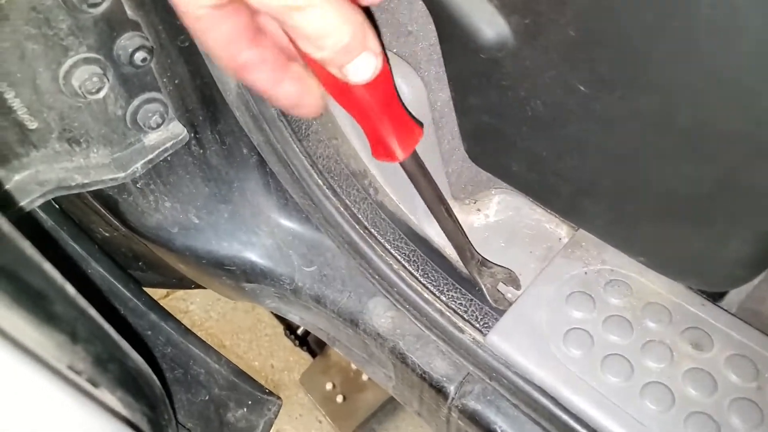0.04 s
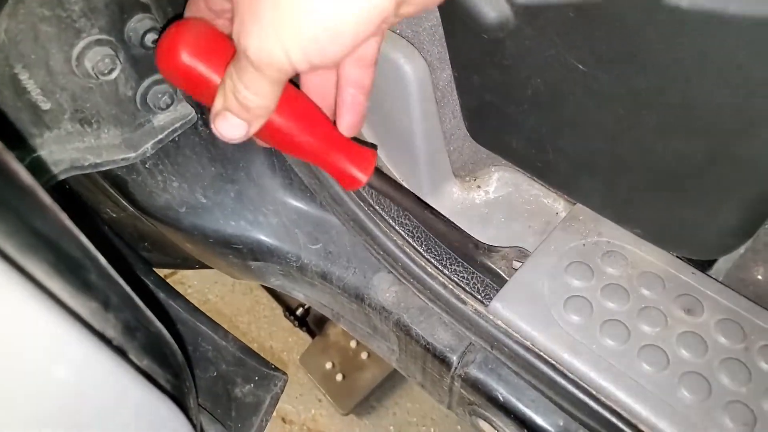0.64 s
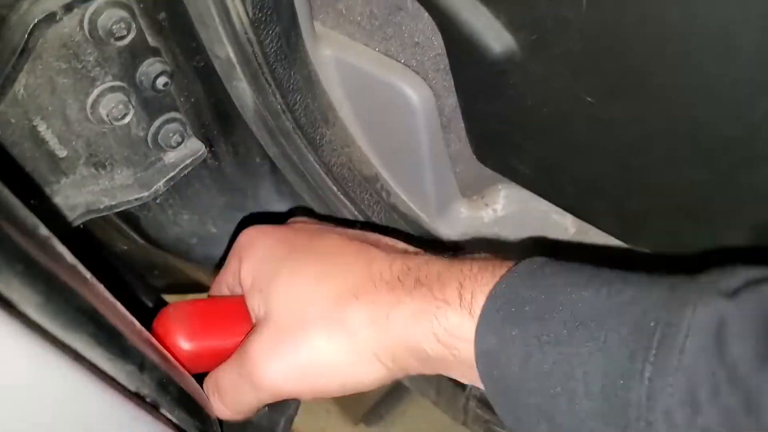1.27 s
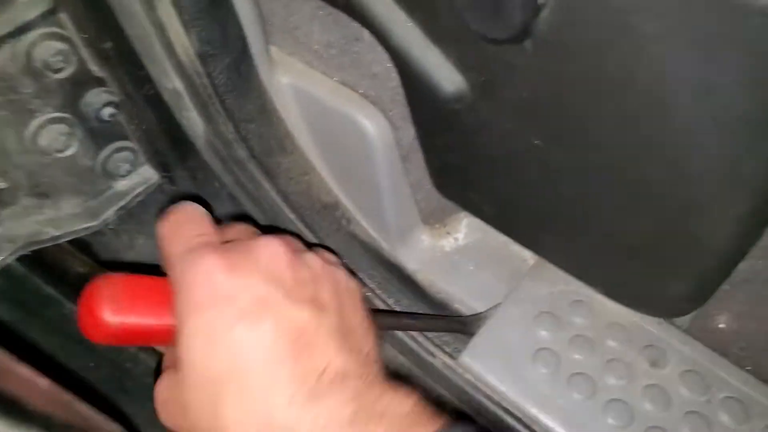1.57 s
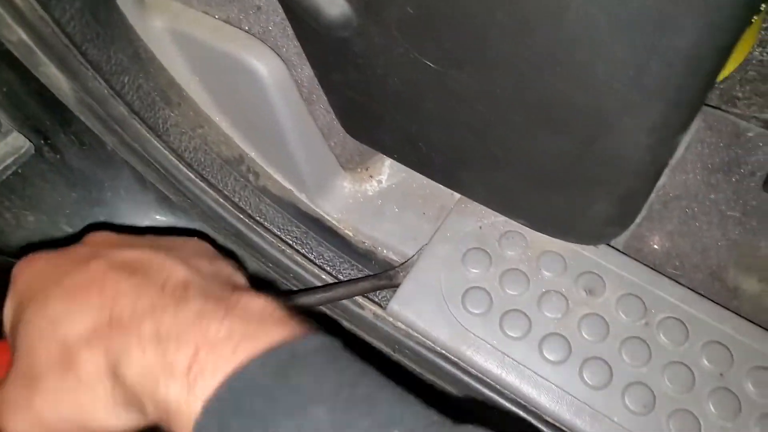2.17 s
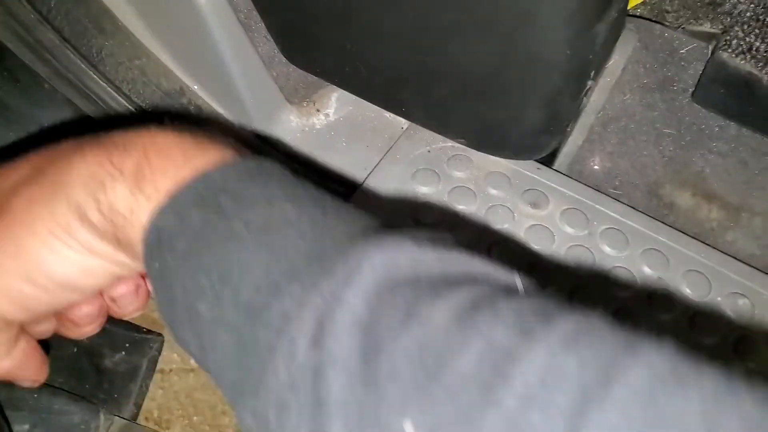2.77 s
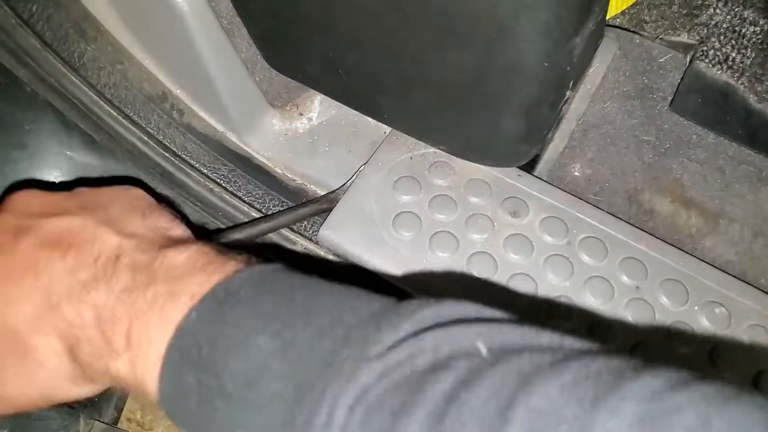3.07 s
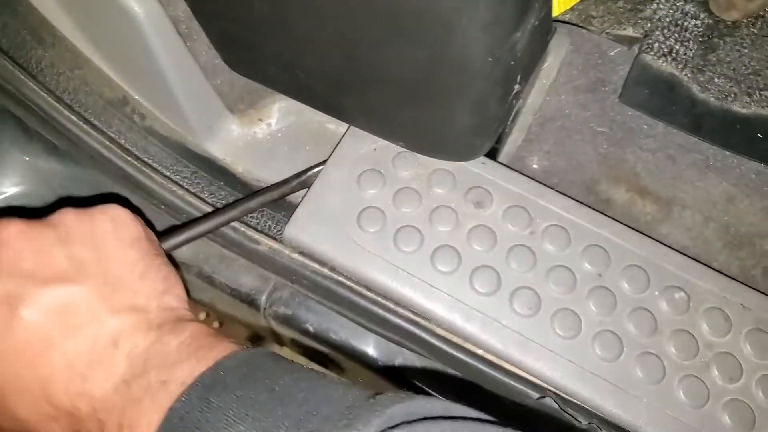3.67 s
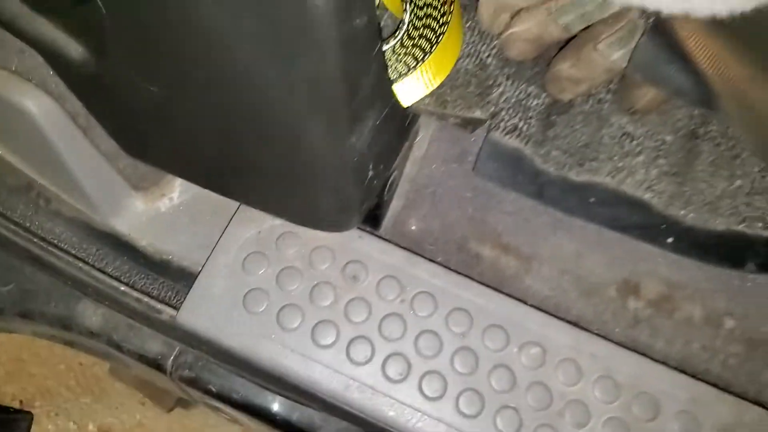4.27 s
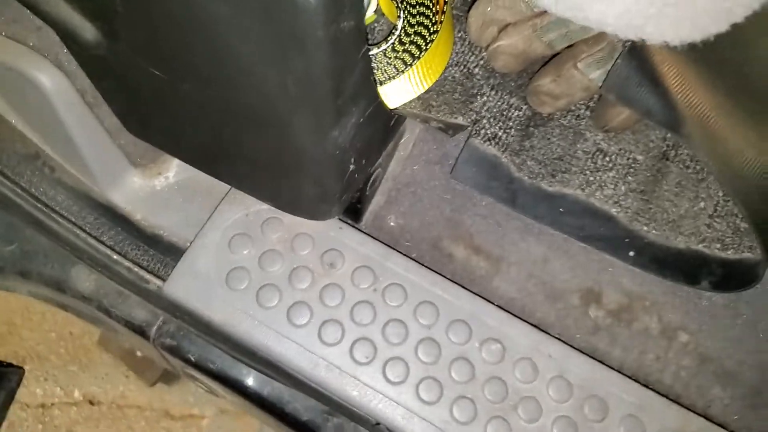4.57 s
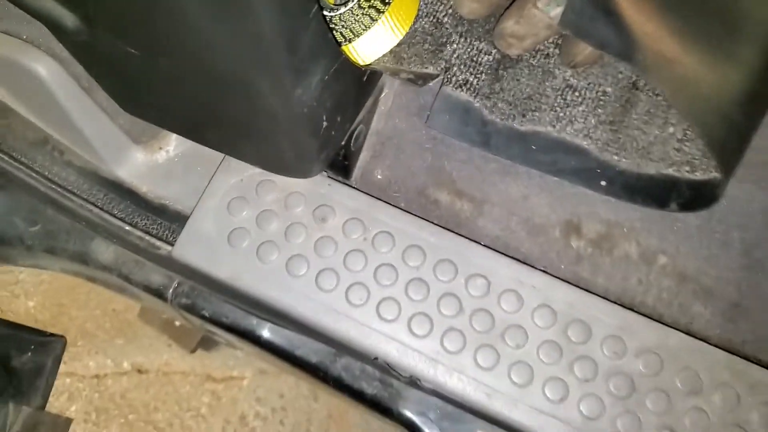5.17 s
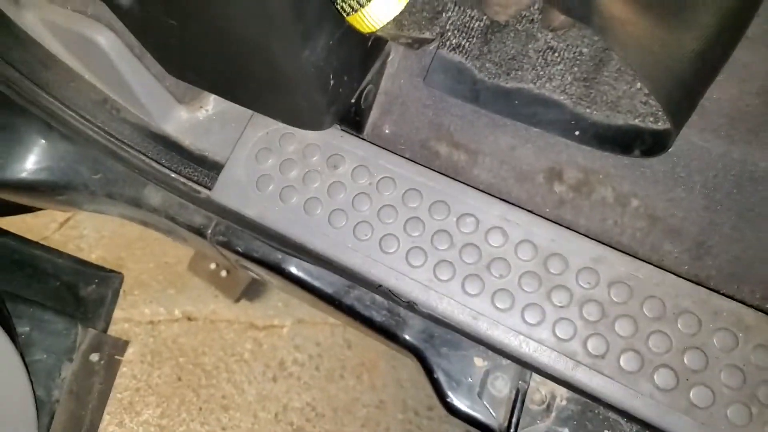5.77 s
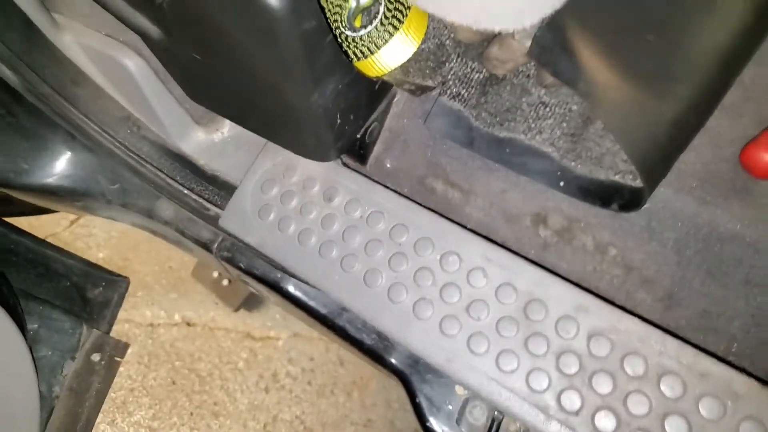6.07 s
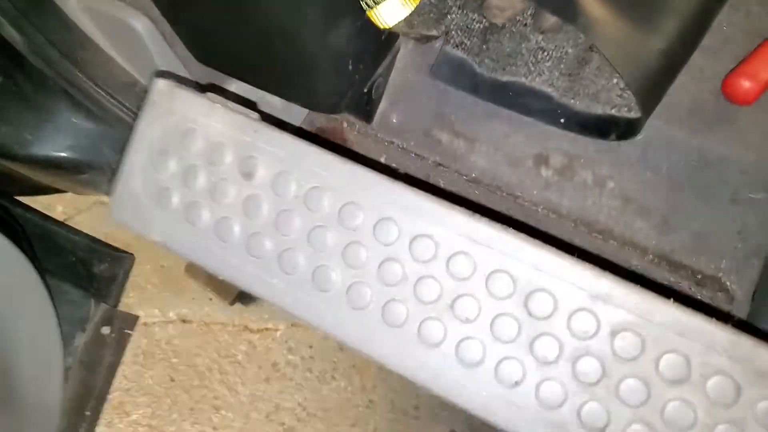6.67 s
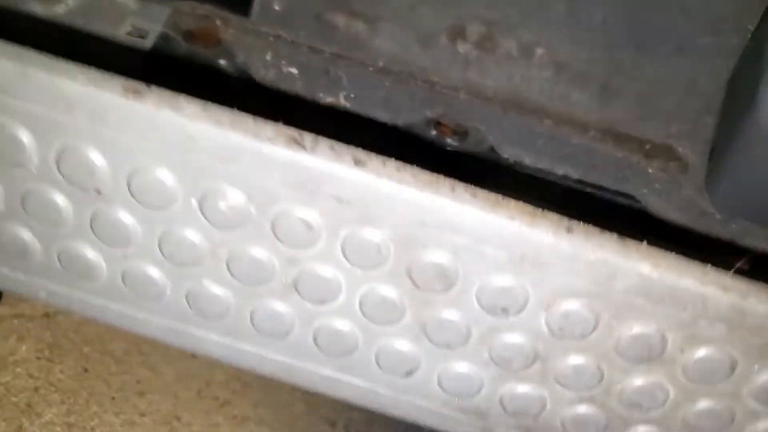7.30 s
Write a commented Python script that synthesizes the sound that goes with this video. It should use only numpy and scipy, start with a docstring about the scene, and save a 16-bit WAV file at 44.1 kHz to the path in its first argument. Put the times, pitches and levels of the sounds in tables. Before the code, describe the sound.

A steel prying tool works on a plastic sill cover, close and slightly left, with a short vehicle cab echo. The tool clinks at about 0.3 seconds, a clip snaps at 0.6 and a scraping knock follows at 0.8. At 1.3 comes a loud crack with a hollow panel boom. Hands and a sleeve rub the plastic between blows. Sharp snaps land around 2.4, then scrapes and knocks crowd together from 2.7 to 3.8, strongest near 3.5 with a deep thump. A lull follows, with faint ticks and a dull thud at 4.7. Another clip snaps at 5.5. Just after 6 seconds the cover judders with a brief low groan ending in a click. More rubbing, a soft knock at 6.8 and light scrapes around 7.3 finish the job. A quiet workshop hum and low rumble continue throughout.

```python
"""A steel prying tool levers a plastic sill cover off its clips, close to the microphone in a vehicle cab.
The tool taps and scrapes, the clips snap loose and knock the hollow sill, and body panels boom.
Hands and sleeve rub the plastic between the blows, then work the cover free; it judders on a clip.
The work sits a little to the left, with a short cab echo; further off a workshop hums quietly."""
import sys
import numpy as np
from scipy import signal
from scipy.fft import rfft, irfft, next_fast_len
from scipy.io import wavfile
from scipy.ndimage import uniform_filter1d

SR = 44100
rng = np.random.default_rng(int(sys.argv[2]) if len(sys.argv) > 2 else 0)


def inscribe(sig):
    """Save sig as 16-bit PCM at rate SR to the path in sys.argv[1].

    A 1-D sig is mono; a 2-D sig holds one channel per row.
    Samples are clipped to [-1, 1] before scaling.
    """
    pcm = np.round(np.clip(np.atleast_2d(sig).T, -1, 1) * 32767)
    wavfile.write(sys.argv[1], SR, pcm.astype(np.int16))


N = 332514
T = np.arange(N) / SR


def gain_of(db):
    """Decibels to amplitude."""
    return 10 ** (np.asarray(db) / 20)


def unit_rms(x):
    """Scales to unit rms."""
    return x / np.sqrt(np.mean(x ** 2) + 1e-20)


def curve_at(points, hz):
    """Reads a curve on a log-frequency axis."""
    f, value = np.transpose(points)
    return np.interp(np.log(hz + 1), np.log(f + 1), value)


def add(mix, s, sound):
    """Mixes a sound into both channels at s seconds."""
    part = mix[:, round(s * SR):][:, :sound.shape[1]]
    part += sound[:, :part.shape[1]]


def coloured(x, spectrum):
    """Gives x a spectrum, at unit rms."""
    size = next_fast_len(N)
    gains = gain_of(curve_at(spectrum, np.fft.rfftfreq(size, 1 / SR)))
    return unit_rms(irfft(rfft(x, size) * gains, size)[..., :N])


def pair(x, likeness, left_db):
    """Two unrelated signals become partly alike channels, the right one quieter by left_db."""
    right = likeness * x[0] + np.sqrt(1 - likeness ** 2) * x[1]
    return np.array([x[0], right * gain_of(-left_db)])


def band(x, lo_hz, hi_hz, order=3):
    """Causal band-pass."""
    return signal.sosfilt(signal.butter(order, [lo_hz, hi_hz], "band", fs=SR, output="sos"), x)


def ring(t, hz, db, t60):
    """One dying mode."""
    return gain_of(db - 60 * t / t60) * np.sin(2 * np.pi * hz * t)


def swell(t, rise, fall, roundness):
    """A movement peaks at t = 0 and dies away; roundness 1 is pointed, 2 a bell."""
    return np.exp(-np.minimum(abs(t / np.where(t < 0, rise, fall)) ** roundness, 30))


def drift():
    """A slow wander at unit rms."""
    return unit_rms(sum(np.sin(2 * np.pi * (hz * T + rng.random())) for hz in np.geomspace(.5, 6, 7)))


def workshop(rumble_db=-1, hiss_db=-72, hum_db=-2, waver_db=3, swell_db=2):
    """The wavering hum of distant machinery, the rumble of the cab and a faint steady hiss."""
    # Machinery tones. Each row: pitch in Hz, relative level in dB.
    tones = [(48.4, -50), (118.4, -66.5)]
    # The rumble swells while the cab is leaned on. Each row: time in seconds, relative level in dB.
    sway = [(0, -51.5), (.55, -49.5), (.8, -41.5), (1.1, -50), (1.7, -53), (2.5, -49.5), (3.1, -47.5),
            (3.9, -50), (4.2, -54), (5.05, -57), (5.6, -47.5), (5.9, -51), (6.2, -43), (6.45, -52.5),
            (7.54, -55.5)]
    # Colours of rumble and hiss. Each row: frequency in Hz, relative level in dB.
    rumble_colour = [(15, -36.5), (30, -20), (45, -2), (62, 0), (85, -3.5), (120, -12.5), (157, -19),
                     (242, -23.5), (427, -41), (1000, -50.5), (2500, -62)]
    hiss_colour = [(500, -6.5), (2400, -9), (3000, -3), (4400, -5), (5300, 1.5), (6700, -0.5), (7500, -18),
                   (11000, -22), (15000, -13)]
    hum = sum(np.sqrt(2) * gain_of(db + waver_db * drift()) * np.sin(2 * np.pi * (hz * T + rng.random()))
              for hz, db in tones)
    sway_db = np.interp(T, *np.transpose(sway)) + swell_db * drift()
    rumble = coloured(pair(rng.standard_normal((2, N)), .97, .5), rumble_colour) * gain_of(sway_db)
    hiss = coloured(pair(rng.standard_normal((2, N)), 0, 10.5), hiss_colour)
    return gain_of(hum_db) * hum + gain_of(rumble_db) * rumble + gain_of(hiss_db) * hiss


def room(x, build_up_s=.0022):
    """Cab and workshop return a diffuse tail, each band dying at its own speed."""
    # Ring of the space. Each row: frequency in Hz, t60 in seconds.
    decays = [(100, .5), (400, 0.3759), (1000, 0.3332), (3000, 0.26), (6000, 0.27), (12000, 0.34)]
    # Colour of the tail. Each row: frequency in Hz, relative level in dB.
    colour = [(100, -0.5), (400, 0.5), (1000, -2.5), (2500, 0.5), (6000, 0.5), (12000, -7)]
    hz, t, bins = signal.stft(pair(rng.standard_normal((2, SR)), .35, 1.8), SR, nperseg=256)
    hz = hz[:, None]
    bins[1] += (bins[0] - bins[1]) / (1 + (hz / 550) ** 4)  # long waves reach both sides alike
    fade = gain_of(curve_at(colour, hz) - 60 * t / curve_at(decays, hz))
    tail = signal.istft(bins * fade * (1 - np.exp(-t / build_up_s)), SR, nperseg=256)[1]
    return signal.fftconvolve(x.mean(0)[None], tail / np.linalg.norm(tail[0]), axes=1)[:, :N]


def effort(roundness=1.5):
    """Hand pressure on the plastic and speed of the sleeve over time, as two gains."""
    # Hand movements. Each row: peak time, rise and fall in seconds, pressure and sleeve in relative dB.
    strokes = [(.26, 0.043, 0.065, -64, -65.5), (.39, 0.095, 0.07, -61.5, -64),
               (.64, 0.043, 0.034, -57, -56), (.81, 0.11, 0.11, -56.5, -69), (1.1, .11, 0.11, -63.5, -64),
               (1.27, 0.053, 0.075, -55.5, -65.5), (1.489, 0.14, .08, -55.5, -67.5),
               (1.77, 0.11, 0.24, -67, -70), (2.205, 0.016, 0.091, -49.5, -54.5),
               (2.38, 0.065, 0.066, -62.5, -60), (2.458, 0.053, 0.026, -41, -52),
               (2.67, .05, 0.19, -49.5, -59.5), (3.05, .11, .1, -55, -58.5), (3.18, 0.069, 0.044, -48, -61),
               (3.3, 0.023, 0.041, -45, -56.5), (3.42, 0.058, 0.17, -44, -64),
               (3.62, 0.034, 0.069, -63.5, -70.5), (3.78, .02, 0.069, -43.5, -51),
               (4.2, .06, 0.052, -82.5, -74), (4.32, .05, .04, -73.5, -87.5),
               (4.61, 0.042, 0.14, -69, -76.5), (4.86, 0.031, 0.058, -71.5, -75.5),
               (5.22, .11, .09, -85.5, -78.5), (5.5, 0.043, 0.2, -58, -68.5),
               (5.82, 0.16, 0.15, -63, -78.5), (6.22, 0.099, 0.098, -51.5, -60.5),
               (6.38, 0.073, 0.049, -55.5, -64), (6.52, .08, 0.17, -73, -80.5),
               (6.9, 0.063, 0.14, -71.5, -86.5), (7.1, .04, 0.066, -70.5, -80.5),
               (7.26, 0.057, 0.082, -58.5, -75), (7.46, .08, 0.11, -71.5, -66)]
    t = T[::64]
    powers = sum((gain_of([[press_db], [sleeve_db]]) * swell(t - s, rise, fall, roundness)) ** 2
                 for s, rise, fall, press_db, sleeve_db in strokes)
    return [np.interp(T, t, np.sqrt(power)) for power in powers]


def wandering_contact(x, patchy_db=3, patch_bins=9, patch_frames=7):
    """The contact wanders, so the colour of a rub keeps changing in small patches."""
    bins = signal.stft(x, nperseg=512)[2]
    patches = uniform_filter1d(rng.standard_normal(bins.shape[:0:-1]).T, patch_bins, 0)
    patches = unit_rms(uniform_filter1d(patches, patch_frames, 1))
    return unit_rms(signal.istft(bins * gain_of(patchy_db * patches), nperseg=512)[1][:, :N])


def friction(stroke, spectrum, level_db, slips_per_s, spread_db, smooth, likeness, left_db):
    """Tiny slips of uneven size over a smooth sliding hiss, following the stroke."""
    slips = (rng.random(N) < slips_per_s / SR) * gain_of(spread_db * np.minimum(rng.exponential(1, N), 4))
    bursts = unit_rms(signal.lfilter([1], [1, -np.exp(-1000 / SR)], slips))  # about a millisecond each
    drive = pair(rng.standard_normal((2, N)) * (bursts + smooth), likeness, left_db)
    return wandering_contact(coloured(drive, spectrum)) * stroke * gain_of(level_db)


def catches(stroke, level_db=-5, per_s=7, spread_db=4, low_hz=700, high_hz=6500, t60=.0084, left_db=7):
    """A sliding edge catches and lets go with small ticks, per_s at each of eight pitches."""
    t, out = np.arange(SR // 30) / SR, np.zeros(N)
    for hz in np.geomspace(low_hz, high_hz, 8):
        ticks = (rng.random(N) < per_s / SR) * gain_of(spread_db * np.minimum(rng.exponential(1, N), 3))
        out += signal.oaconvolve(ticks, ring(t, hz, 0, t60) * np.sqrt(low_hz / hz))[:N]
    return unit_rms(out) * stroke * gain_of([[level_db], [level_db - left_db]])


def rubbing():
    """Close up, hands drag the panel, scrape the plastic and make it catch; the sleeve adds a fizz."""
    # Colours of the three rubs. Each row: frequency in Hz, relative level in dB.
    drag_colour = [(35, -19.5), (55, 3), (85, -1), (140, 2.5), (290, -3.5), (500, -8.5), (800, -38)]
    scrape_colour = [(350, -25.5), (600, 3.5), (900, -0.5), (1200, -5), (1500, -4), (2400, -9.5),
                     (3600, -12), (5000, -18.5), (7500, -35.5)]
    fizz_colour = [(2000, -16), (3600, 5), (5000, 3.5), (6600, 7.5), (7500, -6.5), (10000, -1.5),
                   (13000, 1.5), (16000, -1.5)]
    pressure, sleeve = effort()
    drag = friction(pressure, drag_colour, level_db=6.5, slips_per_s=260, spread_db=2.5,
                    smooth=.89, likeness=1, left_db=5)
    scrape = friction(pressure, scrape_colour, level_db=1.5, slips_per_s=530, spread_db=2.5,
                      smooth=2.2, likeness=.27, left_db=6.5)
    fizz = friction(sleeve, fizz_colour, level_db=6.5, slips_per_s=500, spread_db=3,
                    smooth=1.4, likeness=.094, left_db=10.5)
    return drag + scrape + fizz + catches(pressure)


def panel_booms(rise_s=.0064):
    """Large body panels boom when levered or leaned on, alike on both sides of the microphone."""
    # Each row: start in seconds, level in dB, pitch in Hz, t60 in seconds.
    booms = [(1.318, -24, 55, 0.6), (1.311, -12, 287, 0.11), (1.312, -18, 364, .2),
             (3.088, -20.5, 268, 0.17), (3.3, -21, 440, 0.082), (3.467, -8.5, 127.6, 0.12),
             (3.768, -18, 290, 0.12), (4.706, -26, 98, 0.26), (4.7035, -21, 202, 0.088),
             (4.701, -23.5, 278, 0.058), (4.868, -38, 61.4, 0.25)]
    out, t = np.zeros((2, N)), T[:SR]
    for s, db, hz, t60 in booms:
        boom = ring(t, hz, db, t60) * (1 - np.exp(-t / rise_s))
        add(out, s, boom[None])
    return out


def groan(jitter=.07, rasp_db=-12, overtone_db=-23, uneven_db=4, rasp_hz=(480, 1700)):
    """The bent cover sticks and slips on a clip: a low tone with an uneven crackle at each slip."""
    # Course of the judder. Each row: time in seconds, level in dB, slips per second.
    judder = [(6.029, -60, 168), (6.044, -36, 196), (6.072, -36.5, 183), (6.111, -33.5, 188),
              (6.139, -34.5, 196), (6.165, -58, 130)]
    s, db, hz = np.transpose(judder)
    wobble = unit_rms(uniform_filter1d(rng.standard_normal(N), 300))
    turns = np.cumsum(np.interp(T, s, hz) * (1 + jitter * wobble)) / SR
    tone = np.sin(2 * np.pi * turns) + gain_of(overtone_db) * np.sin(4 * np.pi * turns)
    sizes = gain_of(uneven_db * np.clip(rng.standard_normal(N), -2, 2))[turns.astype(int)]
    slips = sizes * np.exp(-(turns % 1) / .15)
    rasp = unit_rms(band(rng.standard_normal((2, N)) * slips, *rasp_hz, order=2))
    tone = unit_rms(tone * uniform_filter1d(sizes, 200))  # a bigger slip bends the cover further
    envelope = gain_of(np.interp(T, s, db, left=-200, right=-200))
    return (tone + gain_of(rasp_db) * pair(rasp, .29, 7)) * envelope


def scrapes(body_q=4, chatter_db=3):
    """The blade or the cover's edge slips over plastic, ringing one bending resonance under broad grit."""
    # Each row: peak time, rise and fall in seconds, body level in dB, body pitch in Hz, grit in dB.
    strokes = [(.599, 0.004, 0.0082, -36.5, 800, -44.5), (.786, 0.0043, 0.0096, -26.5, 700, -42.5),
               (.852, 0.0046, 0.016, -35.5, 796, -41.5), (.985, 0.01, 0.027, -47.5, 730, -59),
               (1.035, 0.028, 0.01, -50, 1100, -60.5), (1.09, 0.0068, 0.017, -47.5, 750, -64),
               (1.197, .012, 0.0096, -43, 690, -54.5), (2.7, 0.018, .012, -37, 960, -56),
               (2.761, 0.013, 0.01, -34, 1130, -42.5), (2.85, 0.027, 0.17, -42.5, 2250, -66.5),
               (2.942, 0.011, 0.015, -41, 900, -57), (3.292, 0.012, 0.024, -42, 1120, -48.5),
               (3.378, 0.011, .016, -40, 1070, -47), (3.766, 0.014, .01, -36, 1100, -43),
               (3.833, .005, 0.016, -40, 1150, -46), (5.781, 0.021, 0.023, -51.5, 930, -57),
               (6.135, 0.034, .02, -45, 2350, -70), (7.287, 0.03, 0.041, -50, 1600, -48),
               (7.412, 0.019, 0.025, -50.5, 1640, -42)]
    # Colour of the grit. Each row: frequency in Hz, relative level in dB.
    grit_colour = [(1200, -11.5), (2000, -4), (3000, -0.5), (4200, -1.5), (6400, 0.5), (7500, -12),
                   (10000, -11), (14000, -6.5)]
    slipping = gain_of(chatter_db * unit_rms(uniform_filter1d(rng.standard_normal(N), 90)))
    grit = coloured(pair(rng.standard_normal((2, N)) * slipping, .4, 6.2), grit_colour)
    drive = pair(rng.standard_normal((2, N)) * slipping, .36, 6.7)
    out = np.zeros((2, N))
    for s, rise, fall, body_db, hz, grit_db in strokes:
        span = (T > s - 4 * rise) & (T < s + 4 * fall)
        stroke = swell(T[span] - s, rise, fall, roundness=1)
        body = signal.lfilter(*signal.iirpeak(hz, body_q, SR), band(drive[:, span], hz * .6, hz * 1.25))
        out[:, span] += stroke * (gain_of(body_db) * unit_rms(body) + gain_of(grit_db) * grit[:, span])
    return out


def tool_taps(left_db=3):
    """The steel shank rings where the tool taps."""
    # Modes of the shank. Each row: pitch in Hz, level against the tap in dB, t60 in seconds.
    shank = [(563, 3.5, .055), (2369, -12, .07), (2640, -3.5, .065), (2887, -3.5, .06), (3100, -17, .11),
             (3560, -8.5, .06), (6950, -13.5, .055)]
    # Each row: start in seconds, strength in dB.
    taps = [(.3345, -24.5), (2.843, -40.5)]
    out = np.zeros((2, N))
    for s, tap_db in taps:
        clink = sum(ring(T[:SR], hz, db + tap_db, t60) for hz, db, t60 in shank)
        add(out, s, clink * gain_of([[0], [-left_db]]))
    return out


def hollow_sill(t, blow_spectrum, spread_db=2, detune=.008, shade_db=3):
    """Sill and cover ring; each spot that is struck drives their modes a little differently."""
    # Each row: pitch in Hz, level against the blow in dB, t60 in seconds.
    modes = [(140, -2.5, 0.15), (180, -12.5, 0.28), (284.3, -4, 0.068), (377, -17, 0.21), (483, -13, .12),
             (601, -15, 0.19), (760, -10.5, .09), (935, -10, 0.045), (1180, -14, 0.098),
             (1410, -15.5, 0.18), (1640, -14, 0.11), (2164, -15.5, .09), (2640, -12, .045),
             (3600, -9, 0.075), (4640, -10.5, 0.04), (6570, -10, .05)]
    out = np.zeros((2, len(t)))
    for hz, db, t60 in modes:
        blow_db = curve_at(blow_spectrum, hz) + spread_db * rng.standard_normal()
        mode = ring(t[t < t60], hz * (1 + detune * rng.standard_normal()), db + blow_db, t60)
        right_db = -shade_db * np.log2(1 + hz / 700)  # high modes are fainter on the right
        out[:, :len(mode)] += mode * gain_of([[0], [right_db]])
    return out


def hit(levels_db, clack_hz, snap_hz, rattle_t60, clack_width_hz=200, snap_width_hz=450,
        broad_share=.73, snap_reach=1.6, blunting_db_per_s=35, port_gap_s=.0001):
    """A sharp shock and a short rattle of the loose cover sound in six voices and wake the sill."""
    # Thump, knock, clack, snap, click and tick. Each row: low and high edge in Hz, shortest t60 in
    # seconds, share of the rattle's t60, shock against rattle in dB, left-right likeness, left louder
    # in dB, right later in seconds (capped at the travel time between the microphone's two ports).
    voices = [(115.5, 195, 0.11, 0.87, -5, 0.94, 0.9, 0.00028),
              (236, 520, 0.057, .9, -5.5, .93, 4, 0.00045),
              (564, 1150, 0.018, 0.99, -0.5, 0.59, 5.5, 0.0000047),
              (1410, 4300, .008, 1, -7, 0.45, 8.5, 0.0007),
              (3900, 6480, 0.0096, 0.55, -3, 0.31, 11.5, 0.00054),
              (8200, 22000, .008, .5, -5, .5, 12.5, 0.0019)]
    t = np.arange(SR // 4) / SR
    out, blow_spectrum = np.zeros((2, len(t))), []
    resonances = {"clack": (clack_hz, clack_width_hz), "snap": (snap_hz, snap_width_hz)}
    for (name, db), row in zip(levels_db.items(), voices):
        lo_hz, hi_hz, shortest, share, shock_db, likeness, left_db, lag = row
        decay = gain_of(np.maximum(-60 * t / (shortest + share * rattle_t60), -150))
        shake = rng.standard_normal((2, len(t))) * decay
        parts = band(np.vstack([shake, (t == 0) + 1e-12]), lo_hz, hi_hz)
        parts /= np.linalg.norm(parts, axis=1, keepdims=True)
        rattle = pair(parts[:2], likeness, 0)
        shock = parts[2] * gain_of(shock_db - blunting_db_per_s * rattle_t60)  # long rattles start softer
        voice = rattle + shock
        if name in resonances:  # the bent span of plastic and its clip each have a pitch of their own
            hz, width = resonances[name]
            voice = broad_share * voice + signal.lfilter(*signal.iirpeak(hz, hz / width, SR), voice)
        if name == "snap":
            voice = band(voice, lo_hz / 2, snap_reach * snap_hz, order=2)
        voice[1] = np.interp(t - min(lag, port_gap_s), t, voice[1], left=0)
        # a level is the voice's whole energy spread over a fiftieth of a second
        voice *= np.sqrt(SR // 50) / np.linalg.norm(voice, axis=1, keepdims=True)
        out += voice * gain_of([[db], [db - left_db]])
        blow_spectrum.append((np.sqrt(lo_hz * hi_hz), db))
    return out + hollow_sill(t, blow_spectrum)


def prying(level_db=-1):
    """Levered clips snap and the cover knocks: the sill lends weight, hard contact a bright edge."""
    # Each row: start in seconds, relative strength in dB, then weight, snap and edge in dB against
    # the clack, clack and snap pitch in Hz, t60 of the rattle in seconds.
    hits = [(.28, -32.5, -5.5, -9.5, -9, 1050, 2850, 0.017), (.334, -34.5, -15, 12, 4.5, 590, 2900, 0.021),
            (.601, -34, -10, -8, -7, 1110, 1600, 0.043), (.612, -27.5, -13, -11, -7.5, 720, 1610, 0.046),
            (0.6181, -15.5, -18, -15, -20.5, 595, 1600, 0.019),
            (0.6228, -20, -16, -15, -15, 1010, 1600, .02),
            (.788, -29.5, 0.5, -10.5, -13.5, 550, 1590, 0.058),
            (.811, -35.5, -5, -12, -5.5, 1050, 1610, 0.038),
            (1.249, -42.5, 1.5, -25, -20, 803, 2580, 0.049), (1.311, -16.5, -5, -2, -4.5, 836, 2160, 0.12),
            (1.832, -46.5, -3.5, -6, -3.5, 644, 2640, 0.12), (2.13, -35.5, 0, -13.5, -19, 570, 1686, .04),
            (2.191, -29.5, -7.5, -20, -17, 580, 2760, 0.014),
            (2.401, -15.5, -11.5, -8, -14, 1130, 1870, 0.022),
            (2.44, -25.5, -10, -5, -7.5, 675, 3420, 0.05), (2.45, -19, -8.5, -1.5, -11, 870, 3700, 0.019),
            (2.617, -40, 2, -7, -7, 935, 2430, 0.063), (2.766, -26, -12.5, -15, -30, 1150, 1690, 0.023),
            (2.8426, -39, -0.5, 6, -12, 834, 3800, 0.02), (2.998, -29, -15.5, -6, -28, 1140, 1750, 0.008),
            (3.088, -32, 3.5, -4.5, -16.5, 760, 2270, 0.11), (3.152, -36, -4, 1.5, -10.5, 840, 2220, 0.019),
            (3.3873, -24, -10.5, -6, -11, 760, 2720, 0.012), (3.428, -44, 8.5, 6, 1, 600, 1820, 0.17),
            (3.4475, -17.5, -4, -8.5, -0.5, 1090, 2260, 0.018),
            (3.457, -20, -1, -5.5, -12, 620, 3700, 0.037), (3.5384, -31, -11, -19, -31, 1180, 1670, 0.021),
            (3.766, -30, 0, -5, -7.5, 800, 1620, 0.026), (3.779, -32.5, 2, -8, -12, 567, 1690, .08),
            (3.797, -29.5, -4.5, -18, -26, 1080, 1600, .028),
            (3.809, -30, -16, -9.5, -26, 1128, 1900, 0.056),
            (3.8238, -24, -24.5, -10, -18.5, 990, 1600, 0.041), (4.146, -78.5, 5, 5, 23, 742, 3740, .02),
            (4.283, -71.5, -2, -2, -5, 900, 2600, .06), (4.566, -65.5, 2, -0.5, -6.5, 760, 2500, 0.075),
            (4.6266, -63.5, 3.5, 8.5, 12.5, 899, 2030, .023), (4.683, -61, 27.5, -1, 4.5, 584, 1780, 0.15),
            (4.704, -55, 27, -2.5, 5, 568, 1840, .046), (4.831, -71.5, 23, 5, 2, 571, 3700, .13),
            (4.8624, -68.5, 4.5, 5, 11.5, 1180, 1700, .034),
            (5.421, -56.5, 14, -19.5, -13.5, 640, 1570, 0.22),
            (5.521, -24, -13, -1.5, -17.5, 830, 1780, 0.013), (5.529, -28, -4, -7, -18.5, 954, 1660, 0.16),
            (6.032, -52.5, 9, -11, -12.5, 1000, 1980, .05),
            (6.166, -29.5, -24, -3.5, -23, 1000, 1700, .015), (6.173, -34, -2, 0.5, -26, 1080, 1570, .017),
            (6.255, -45, 2.5, 1, -5, 880, 1590, 0.099), (6.801, -45.5, 6.5, -2, -9, 909, 1620, 0.24)]
    out = np.zeros((2, N))
    for s, strength_db, weight_db, snap_db, edge_db, clack_hz, snap_hz, rattle_t60 in hits:
        balance_db = dict(thump=weight_db, knock=.68 * weight_db - .5, clack=0,
                          snap=snap_db, click=edge_db, tick=edge_db - 6.5)
        levels_db = {name: strength_db + db for name, db in balance_db.items()}
        add(out, s, hit(levels_db, clack_hz, snap_hz, rattle_t60))
    return gain_of(level_db) * out


def scene(room_db=-17):
    """The work on the sill up close, its echo around it and the workshop behind."""
    work = prying() + tool_taps() + panel_booms() + groan() + scrapes()
    return work + gain_of(room_db) * room(work) + rubbing() + workshop()


def record(dry, bass_cut_hz=36, ceiling=.96, top_hz=16300):
    """A bass cut, a ceiling just under full scale, and the band limit."""
    lean = signal.sosfilt(signal.butter(4, bass_cut_hz, "high", fs=SR, output="sos"), dry)
    limited = np.clip(lean, -ceiling, ceiling)
    low_pass = signal.firwin(255, top_hz, window=("kaiser", 9), fs=SR)
    return signal.oaconvolve(limited, low_pass[None], "same")


dry = scene()
out = record(dry)
inscribe(out)
```